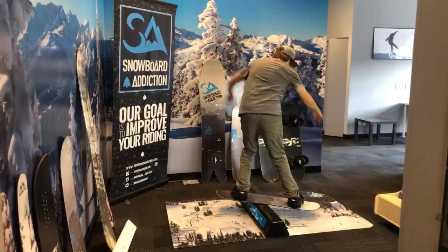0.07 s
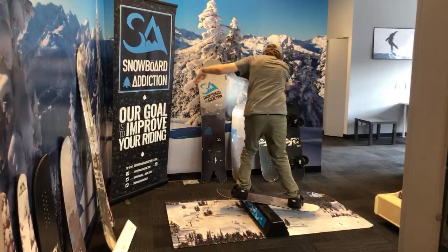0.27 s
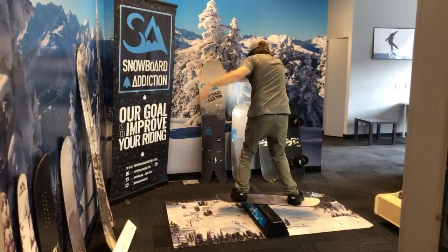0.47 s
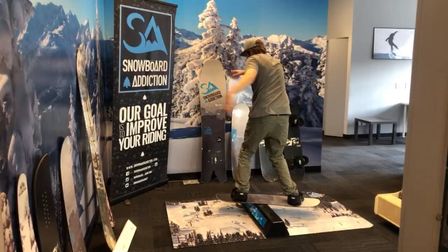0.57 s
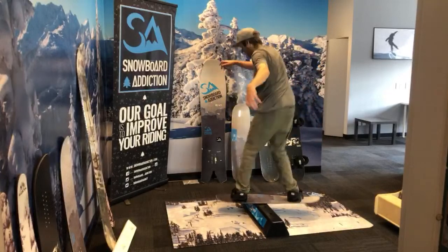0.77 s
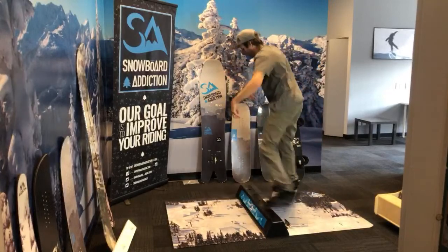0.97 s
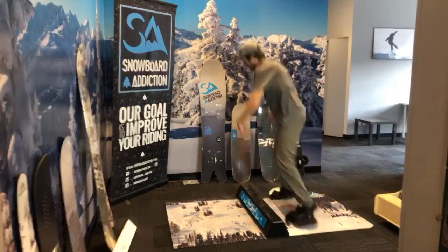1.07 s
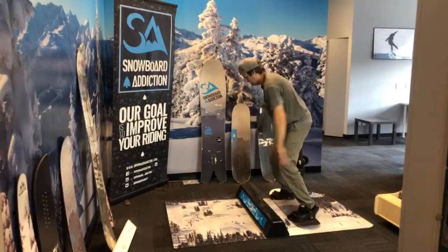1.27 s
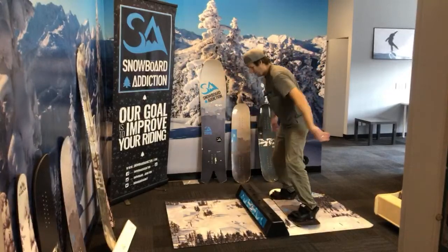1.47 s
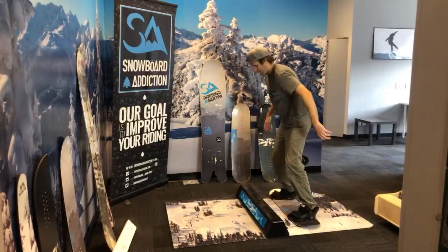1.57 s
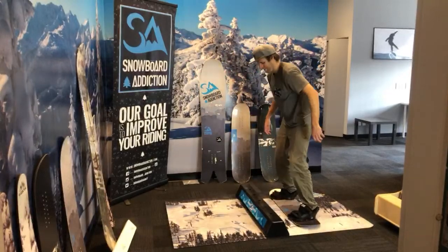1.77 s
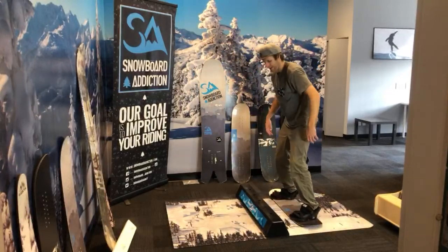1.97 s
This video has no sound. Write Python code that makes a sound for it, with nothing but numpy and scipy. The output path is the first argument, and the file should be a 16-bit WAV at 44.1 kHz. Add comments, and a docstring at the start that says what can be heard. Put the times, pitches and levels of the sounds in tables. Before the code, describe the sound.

A snowboard pops off a low box and slaps down hard on a mat, a sharp crack with a woody low thump, after faint scuffs and soft knocks; live indoor room, single microphone at some distance.

```python
"""Snowboard hop in a showroom

A snowboard swivels on a small balance box, pops off it and lands flat on the mat.
Noise bursts make the edge crack and base clap, and fading sine waves ring board and room and thump the floor.
Grainy noise makes the dying rumble of an earlier event, then rubs and scuffs of base, boots and clothing.
The room rings for about a second over humming ventilation made of steady noise and wavering sine tones.
"""
import sys
import numpy as np
from scipy import signal
from scipy.fft import rfft, irfft, next_fast_len
from scipy.io import wavfile
from scipy.ndimage import map_coordinates

SR = 44100
rng = np.random.default_rng(int(sys.argv[2]) if len(sys.argv) > 2 else 0)


def wav_record(signal):
    """Record a signal, one row per channel, as 16-bit PCM in the file named by sys.argv[1]."""
    frames = np.transpose(np.atleast_2d(signal))
    bounded = np.clip(frames, -1, 1)
    # unit amplitude maps onto the largest positive 16-bit level
    quanta = np.round(bounded * 32767).astype(np.int16)
    wavfile.write(sys.argv[1], SR, quanta)


N = 89170  # length in samples

# In all tables, a fading time is how long the sound takes to drop by 60 dB.
# Noise colours are only shapes: the noise is scaled to a set loudness afterwards.

# Ventilation air. Each row: frequency in Hz, relative level in dB.
AIR_COLOUR = [(25, -46), (45, -38), (70, 7.5), (100, -1.5), (200, 9.5), (300, 7.5), (500, 0.5), (900, -3.5),
              (2000, -15.5), (4000, -25), (8000, -33), (15000, -42.5)]
# Hollow duct resonance. Each row: frequency in Hz, relative level in dB.
DRONE_COLOUR = [(150, -52), (205, -17), (228, -0.5), (246, 0.5), (268, -15), (340, -52)]
# Fan tones. Each row: frequency in Hz, middle level in dB.
FAN_TONES = [(120, -63.5), (155, -69), (239, -57), (358, -66)]
AIR_DB, DRONE_DB = -55.5, -57
FAN_WAVER_PER_S, FAN_WAVER_RAD, FAN_WAVER_DB = 8.6, 0.45, 3

# How long the room rings. Each row: frequency in Hz, fading time in seconds.
ROOM_FADING = [(60, 1.04), (200, 0.85), (500, 1.14), (900, 1.256), (2000, 1.003), (3500, 0.97),
               (5500, 0.76), (8000, 0.57), (12000, 0.34), (16000, 0.17)]
ROOM_BUILD_S = 0.0027
EARLY_DB, EARLY_T60_S = -1.5, 0.3  # nearby walls add a quicker first decay

# Scuffs of base, boots and clothing. Each row: start in seconds, length in seconds, rise in seconds,
# level in dB.
SCUFF_STROKES = [(0.13, .08, 0.035, -69.5), (0.425, 0.01, 0.0056, -64.5), (0.4815, 0.0042, 0.0022, -54.5),
                 (0.495, 0.0084, 0.01, -53), (0.535, 0.016, 0.003, -59), (0.565, 0.031, .008, -61.5),
                 (0.61, .15, 0.055, -66), (0.74, 0.11, 0.055, -58), (0.85, 0.11, 0.035, -60),
                 (0.952, 0.17, 0.0036, -52), (1.741, 0.026, 0.0071, -65.5), (1.765, 0.074, 0.018, -64),
                 (1.86, 0.064, .02, -68.5), (1.99, .04, 0.017, -70.5)]
# Scuff noise. Each row: frequency in Hz, relative level in dB.
SCUFF_COLOUR = [(100, -16), (400, 10), (1000, 7.5), (2000, 4), (3300, 2), (5000, -2), (7200, -9),
                (9500, -17), (15000, -22)]
# Low rumbling noise: the dying tail of an earlier event, then rubs of the base on the box.
# Each row: start in seconds, length in seconds, rise in seconds, level in dB.
RUMBLE_STROKES = [(-0.06, 0.098, .01, -45.5), (0.07, 0.1, 0.0095, -54.5), (0.22, 0.06, 0.034, -58.5),
                  (0.49, 0.074, 0.028, -58), (0.78, 0.07, 0.034, -58)]
# Rumbling noise. Each row: frequency in Hz, relative level in dB.
RUMBLE_COLOUR = [(40, -36), (120, -12.5), (190, 12), (270, -2.5), (370, 1), (550, 2), (750, 2), (950, 0.5),
                 (1500, -5), (2300, -16), (4200, -18), (7000, -33.5), (15000, -52)]
FADE_T60_S, GRAINS_PER_S, GRAIN_DB = 0.061, 500, 1.5

# The floor gives under the rider's weight. Each row: start in seconds, level in dB.
FLOOR_THUMPS = [(0.974, -32.5), (1.058, -37), (1.0929, -22.5)]
FLOOR_HZ, FLOOR_T60_S, FLOOR_ATTACK_S = 77, 0.1, 0.007

# The board rocks softly on the box and the mat. Each row: start in seconds, level in dB.
SOFT_KNOCKS = [(0.343, -63), (0.423, -45), (0.545, -44.5), (0.628, -63), (0.806, -40.5), (1.375, -38.5),
               (1.806, -49), (1.962, -42)]
# Tones that a blow rings: short ones of the board, long ones of the room.
# Each row: frequency in Hz, level in dB, fading time in seconds.
RINGING_TONES = [(181.1, -9, 0.15), (218.1, 0, .14), (248.6, -2.5, 0.082), (292.4, -11.5, 0.49),
                 (372.7, -21.5, 0.71), (427, -3, 0.085), (477.7, -16, 0.48), (507.4, -17.5, 0.53),
                 (566.4, -20.5, 0.48), (769, -28.5, 0.68), (842, -37, 0.93), (872, -32.5, 0.73),
                 (926, -36, 0.5)]
RING_ATTACK_S, RING_WET_DB = 0.006, -10

# Board contacts: take-off, then edge, base and rebounds. Each row: start in seconds, crack level in dB,
# clap level in dB, level of the ringing tones in dB.
BOARD_CONTACTS = [(0.9565, -53, -28.5, -27.5), (0.977, -63, -26, -56), (0.991, -62, -56, -26),
                  (1.012, -67, -28.5, -28), (1.0322, -30.5, -30, -25.5), (1.037, -20, -21, -22.5),
                  (1.0419, -25, -21, -10), (1.0483, -21, -16, -23.5), (1.0528, -25.5, -22.5, -39),
                  (1.0639, -27, -25.5, -32), (1.0815, -28, -15.5, -19.5), (1.1255, -49, -34.5, -19.5),
                  (1.1434, -63, -41, -19.5), (1.19, -58, -39, -31.5)]
# Crack of the edge. Each row: frequency in Hz, relative level in dB.
CRACK_COLOUR = [(100, -54), (900, -1.5), (1900, -7), (2360, 0), (2600, -3.5), (3250, 1.5), (3900, -5),
                (4500, -7.5), (5200, -14), (7300, -13.5), (9000, -20), (12000, -26.5), (15500, -32)]
# Clap of the flat base. Each row: frequency in Hz, relative level in dB.
CLAP_COLOUR = [(30, -53), (60, -13), (130, -30), (175, 1.5), (290, 2.5), (350, -3), (470, -1.5), (680, -5),
               (920, -7.5), (1300, -14), (2200, -22), (6000, -39.5), (15000, -50.5)]
CRACK_ATTACK_S, CRACK_T60_S, CRACK_WET_DB = 0.0011, 0.044, -3
CLAP_ATTACK_S, CLAP_T60_S, CLAP_WET_DB = 0.0021, 0.055, 0

LOW_CUT_HZ, TOP_HZ = 53, 15730  # band limits of the recorder


def amp(db):
    """Turn decibels into a plain multiplier."""
    return 10 ** (np.asarray(db) / 20)


def unit(x):
    """Scale a sound to an average (rms) strength of 1."""
    return x / np.sqrt(np.mean(x ** 2) + 1e-20)


def along(points, hz):
    """Read a value between (frequency, value) points, with frequency on a log scale."""
    point_hz, values = np.transpose(points)
    return np.interp(np.log(hz + 1), np.log(point_hz + 1), values)


def since(start):
    """Seconds passed since the start, zero before it."""
    return np.maximum(np.arange(N) / SR - start, 0)


def strike(t, attack_s, t60):
    """Loudness curve of a blow: a quick rise and an exponential decay."""
    rise = 1 - np.exp(-t / attack_s)
    return rise * amp(-60 * t / t60)


def wobble(rate, size):
    """A smooth curve through random points, `rate` points a second."""
    points = rng.standard_normal(SR // 4)
    positions = np.arange(size) * rate / SR
    return map_coordinates(points, [positions], mode="wrap")


def noise(colour, size, grain_db=0):
    """Coloured noise of rms 1, clumped into grains before it is coloured."""
    m = next_fast_len(size + 8192)
    grains = rng.standard_normal(m) * amp(grain_db * wobble(GRAINS_PER_S, size=m))
    gains = amp(along(colour, np.fft.rfftfreq(m, 1 / SR)))
    return unit(irfft(rfft(grains) * gains, m)[:size])


def in_room(x, wet_db):
    """Direct sound plus early reflections and a scattered tail whose high treble dies first."""
    hz, t, bands = signal.stft(rng.standard_normal(SR + SR // 4), SR, nperseg=256)
    late = strike(t, ROOM_BUILD_S, along(ROOM_FADING, hz)[:, None])
    early = amp(EARLY_DB) * strike(t, ROOM_BUILD_S, EARLY_T60_S)
    tail = signal.istft(bands * (late + early), SR, nperseg=256)[1]
    tail = unit(tail) / np.sqrt(len(tail))  # total energy 1
    return x + amp(wet_db) * signal.fftconvolve(x, tail)[:len(x)]


def ventilation():
    """Soft air noise, a fluttering narrow-band duct drone and fan tones wavering in level and phase."""
    hum = np.zeros(N)
    for hz, db in FAN_TONES:
        level = np.sqrt(2) * amp(db + FAN_WAVER_DB * wobble(FAN_WAVER_PER_S, size=N))
        phase = FAN_WAVER_RAD * wobble(FAN_WAVER_PER_S, size=N)
        hum += level * np.sin(2 * np.pi * hz * since(0) + phase)
    drone = amp(DRONE_DB) * noise(DRONE_COLOUR, size=N)
    air = amp(AIR_DB) * noise(AIR_COLOUR, size=N)
    return hum + drone + air


def grainy_strokes(strokes, colour, wet_db):
    """Grainy noise for rubs and rumble: each stroke swells, and fades once its length has passed."""
    lead = SR // 4  # begin early, as a stroke may be under way already
    t = np.arange(-lead, N) / SR
    loudness = np.zeros(len(t))
    for start, length, rise, db in strokes:
        swell = np.clip((t - start) / rise, 0, 1)
        fade = amp(-60 * np.maximum(t - start - length, 0) / FADE_T60_S)
        loudness += amp(db) * swell * fade
    grains = noise(colour, size=len(t), grain_db=GRAIN_DB)
    return in_room(loudness * grains, wet_db)[lead:]


def floor():
    """Each shift of weight makes the floor sway at one low pitch, heard as a short thump."""
    thumps = np.zeros(N)
    for start, db in FLOOR_THUMPS:
        t = since(start)
        sway = np.sin(2 * np.pi * FLOOR_HZ * t)
        thumps += amp(db) * strike(t, FLOOR_ATTACK_S, FLOOR_T60_S) * sway
    return in_room(thumps, wet_db=-5.5)


def ring(start):
    """A blow rings short tones of the board and long ones of the room, each a fading sine wave."""
    t = since(start)
    out = np.zeros(N)
    for hz, db, t60 in RINGING_TONES:
        level = amp(db + rng.normal(0, 1))  # the balance of the tones differs a little at every blow
        out += level * strike(t, RING_ATTACK_S, t60) * np.sin(2 * np.pi * hz * t)
    return out


def knocks():
    """Soft rocking knocks ring the tones of board and room without any crack."""
    knocking = sum(amp(db) * ring(start) for start, db in SOFT_KNOCKS)
    return in_room(knocking, RING_WET_DB)


def board():
    """Every contact cracks the edge, claps the base (both noise bursts) and rings board and room."""
    out = np.zeros(N)
    for start, crack_db, clap_db, ring_db in BOARD_CONTACTS:
        t = since(start)
        crack = strike(t, CRACK_ATTACK_S, CRACK_T60_S) * noise(CRACK_COLOUR, size=N)
        clap = strike(t, CLAP_ATTACK_S, CLAP_T60_S) * noise(CLAP_COLOUR, size=N)
        out += in_room(amp(crack_db) * crack, CRACK_WET_DB)
        out += in_room(amp(clap_db) * clap, CLAP_WET_DB)
        out += in_room(amp(ring_db) * ring(start), RING_WET_DB)
    return out


def scene():
    """Add up all sources at one microphone."""
    scuffs = grainy_strokes(SCUFF_STROKES, SCUFF_COLOUR, wet_db=1)
    rumble = grainy_strokes(RUMBLE_STROKES, RUMBLE_COLOUR, wet_db=-0.5)
    mix = ventilation() + scuffs + rumble + floor() + knocks() + board()
    return mix[None]  # one channel


def record(dry):
    """The recorder cuts the deep bass steeply and keeps nothing above its band limit."""
    m = next_fast_len(N + SR // 2)
    hz = np.fft.rfftfreq(m, 1 / SR)
    low_cut = 1 / (1 + (LOW_CUT_HZ / (hz + 1)) ** 10)
    return irfft(rfft(dry, m) * low_cut * (hz < TOP_HZ), m)[..., :N]


dry = scene()
out = record(dry)
wav_record(out)
```